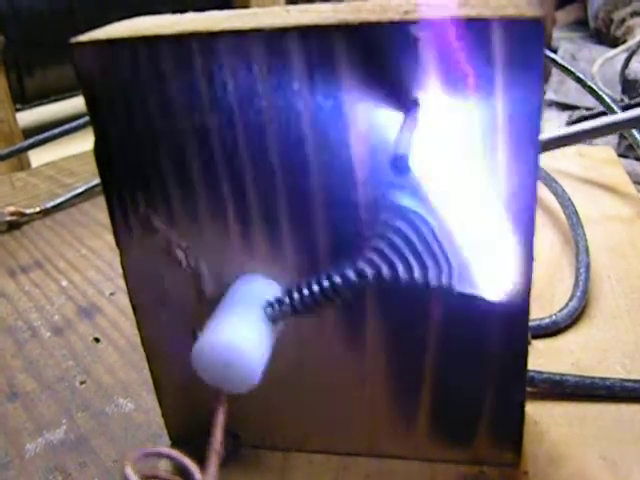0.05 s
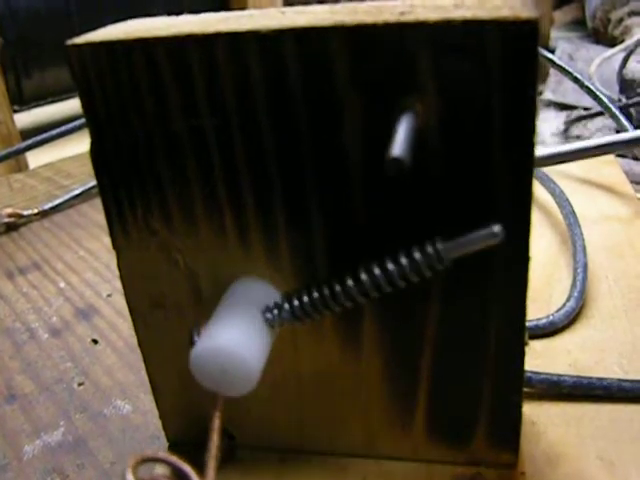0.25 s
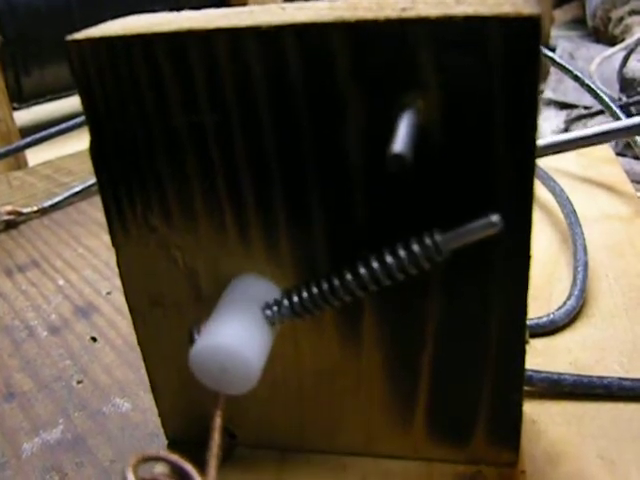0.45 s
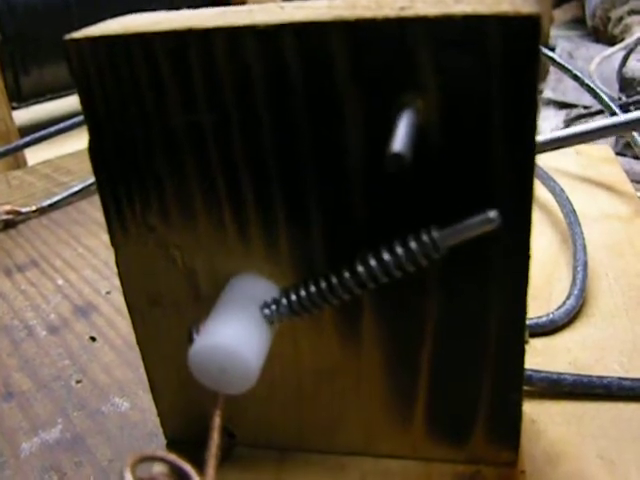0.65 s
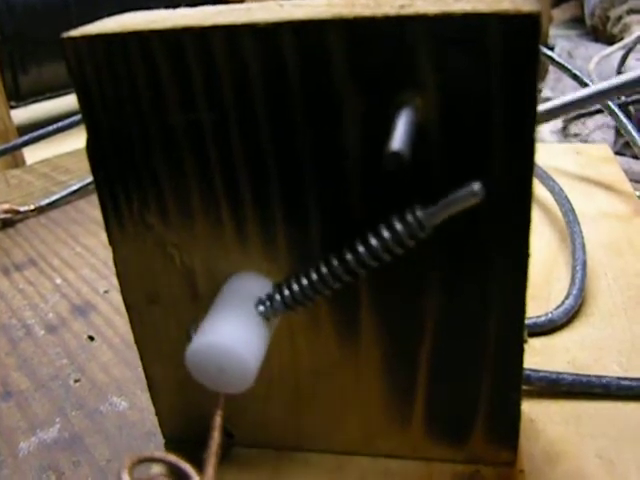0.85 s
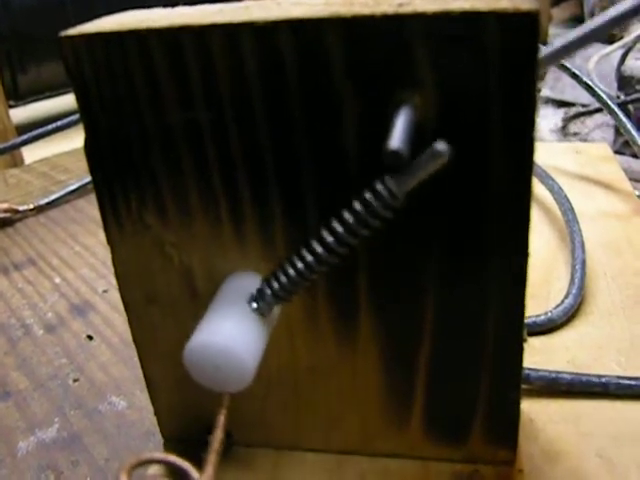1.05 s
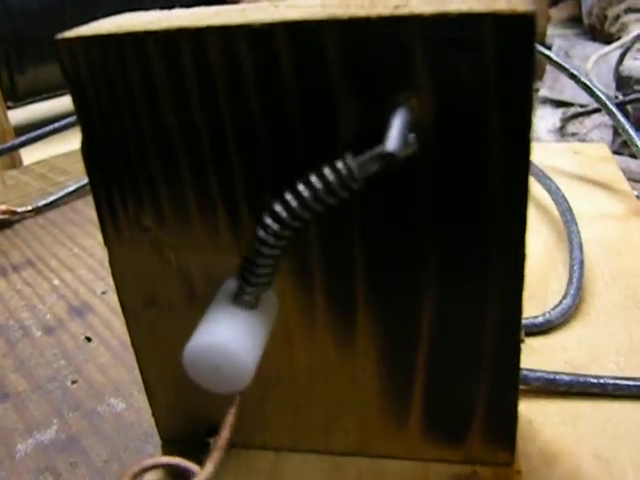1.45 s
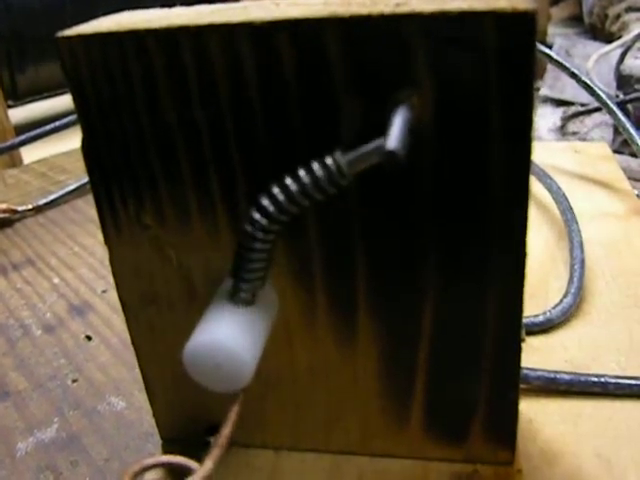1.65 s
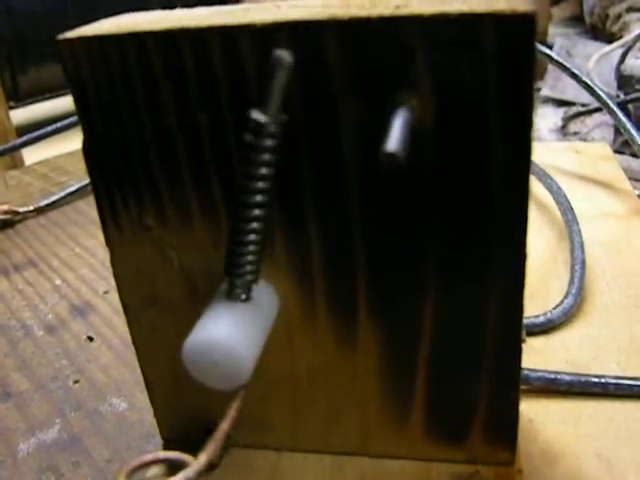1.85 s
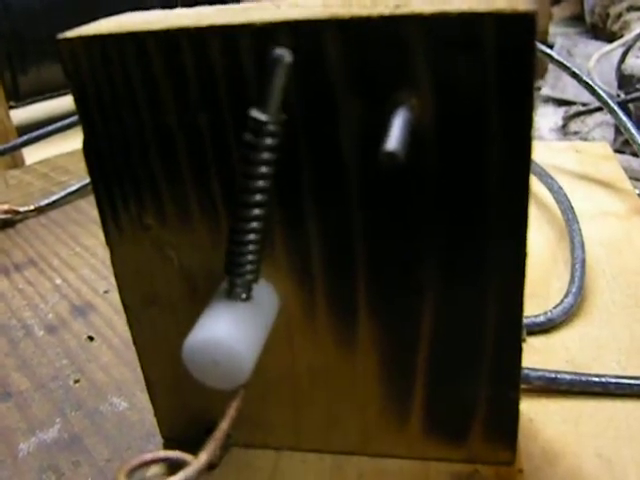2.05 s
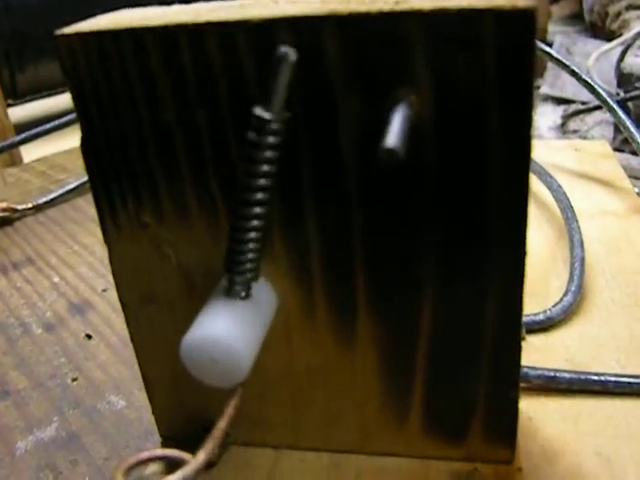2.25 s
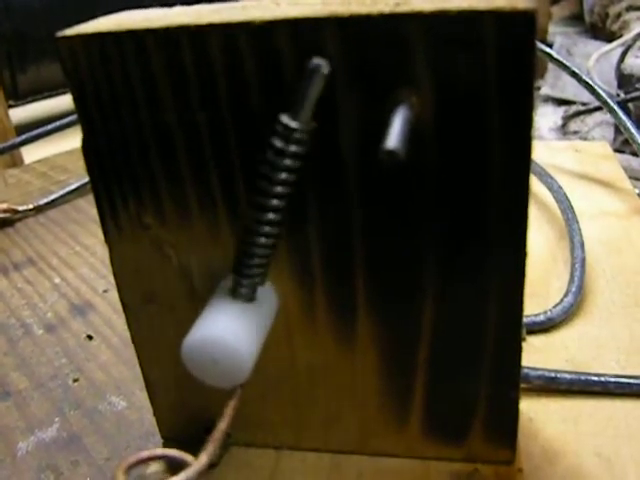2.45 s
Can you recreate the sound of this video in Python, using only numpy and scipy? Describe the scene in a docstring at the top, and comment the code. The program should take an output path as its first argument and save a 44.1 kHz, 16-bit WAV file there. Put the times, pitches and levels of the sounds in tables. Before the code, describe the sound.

Two loud, cracking snaps of a coil spring on a wooden board, over low hum.

```python
"""Snapping coil spring

A coil spring on a wooden board is bent past a steel pin and snaps free twice, once each way. Friction
makes its tip scrape and slip before each release. Each snap is an impulse: it cracks, drives the modes
of the board and the coil, and excites the room. A small narrow-band microphone hears it over low hum
and hiss, and overloads on the snaps."""
import sys
import numpy as np
from scipy import signal
from scipy.fft import rfft, irfft
from scipy.io import wavfile

SR = 44100
rng = np.random.default_rng(int(sys.argv[2]) if len(sys.argv) > 2 else 0)


def digitize_waveform(pressure):
    """Quantize a signal to 16-bit integers and store it at the path in sys.argv[1].

    Rows of a 2-D input are taken as channels; values are limited to [-1, 1].
    """
    field = np.atleast_2d(pressure).T
    bounded = np.clip(field, -1, 1)
    quanta = np.round(bounded * 32767).astype(np.int16)
    wavfile.write(sys.argv[1], SR, quanta)


N = 110250
T = np.arange(N) / SR
HZ = np.fft.rfftfreq(N, 1 / SR)


# releases from the pin: start_s, crack_db, thump_db, board_db, room_db, boom_db
RELEASES = [(0.2314, -4, -2.5, -1.5, -0.5, -27), (1.8872, -4.5, -0.5, 1, -2, -36.5)]
def snaps():
    """Impulse excitation: each release sets off a crack, the board, the coil and the room."""
    out = np.zeros(N)
    attack = 1 - np.exp(-T / 0.00032)
    for release, (start_s, crack_db, thump_db, board_db, room_db, boom_db) in enumerate(RELEASES):
        add(out, start_s, attack * (amp(crack_db) * crack() + amp(board_db) * board(release) + coil(release)))
        add(out, start_s, amp(thump_db) * thump() + amp(boom_db) * boom() + amp(room_db) * room())
    return out


# spectrum of a crack: frequency_hz, relative_db
CRACK_SPECTRUM = [(100, -5.5), (500, 22), (800, 8), (1100, 5), (1600, -1.5), (2200, 14.5), (2900, 5.5),
                  (3900, 10), (5000, -8)]
def crack():
    """A brief impact spreads its energy over a broad band."""
    return burst(noise(CRACK_SPECTRUM), t60_s=0.047)


# modes of the board: pitch_hz, first_release_db, second_release_db, t60_s
BOARD_MODES = [(224.8, -28, -31, 0.22), (250.5, -27, -29, 0.4), (328, -18.5, -19, .24),
               (354, -21, -20, 0.26), (393.8, -28.5, -17, .22), (422.3, -17, -22.5, .26),
               (565.5, -26, -15, .18), (690.6, -21.5, -24.5, .26), (803, -31.5, -18.5, 0.16),
               (1164, -32.5, -32, 0.25), (1380, -21, -23.5, 0.11), (1586, -23, -25, .17),
               (1770, -26, -33.5, 0.24), (2004, -29, -41, 0.2), (2104, -13, -25, 0.083),
               (2217, -43, -10.5, 0.047), (2550, -34, -46, .24), (2805, -28, -41, 0.2)]
def board(release):
    """Modal vibration: each release drives the same modes of the wood in different proportions."""
    return ring([(hz, levels[release], t60_s) for hz, *levels, t60_s in BOARD_MODES])


def thump(pitch_hz=145.2, t60_s=0.039):
    """Heavy damping: the kicked board swings for only a few cycles."""
    return -np.sin(2 * np.pi * pitch_hz * T) * fade(t60_s)


def boom(pitch_hz=131.6, peak_s=0.062, width_s=0.025):
    """A low tone swells and fades under a Gaussian envelope."""
    return np.sin(2 * np.pi * pitch_hz * T) * np.exp(-.5 * ((T - peak_s) / width_s) ** 2)


# bending modes of the coil: pitch_hz, first_release_db, second_release_db, t60_s
COIL_MODES = [(121.2, -40, -43.5, 1.8), (367.3, -48.5, -41, 0.78), (495, -61, -36.5, .8),
              (498, -36.5, -59.5, .75), (556, -31.5, -38.5, .6), (995, -33, -47.5, 0.5),
              (1083, -46, -43, 2.5)]
def coil(release):
    """Light damping: the coil's bending modes ring on faintly after the board."""
    return ring([(hz, levels[release], t60_s) for hz, *levels, t60_s in COIL_MODES])


# impacts of the loose coil: start_s, level_db
CHATTER_HITS = [(0.2396, -11.5), (0.2442, -17.5), (0.2525, -23), (0.304, -34), (1.898, -27), (1.908, -24.5),
                (1.936, -31.5)]
def chatter():
    """Secondary impacts: the loose coil rattles just after each snap."""
    out = np.zeros(N)
    for start_s, level_db in CHATTER_HITS:
        add(out, start_s, amp(level_db) * crack())
    return out


# spectrum of friction: frequency_hz, relative_db
FRICTION_SPECTRUM = [(80, -8.5), (290, -17), (410, 8), (500, -1.5), (580, 2.5), (800, -0.5), (1180, -3),
                     (1550, -15.5), (1900, -10.5), (2300, -3), (2800, -16), (4200, -25.5)]
# slips on the pin or in the holder: start_s, level_db, centre_hz
SLIP_EVENTS = [(0.0708, -33.5, 540), (0.1035, -39.5, 476), (0.1915, -29.5, 735), (0.218, -34, 905),
               (0.228, -30.5, 1320), (0.828, -44.5, 820), (1.531, -41.5, 850), (1.677, -40, 2180),
               (1.6865, -31.5, 1400), (1.841, -39.5, 1180), (1.852, -26.5, 866), (1.870, -20.5, 696),
               (1.880, -26.5, 800), (1.885, -16.5, 1400)]
def slips(t60_s=0.038, echo_db=-18):
    """Stick-slip motion: small jerks of the spring knock on the board and echo."""
    out = np.zeros(N)
    for start_s, level_db, centre_hz in SLIP_EVENTS:
        direct, echo = (noise(FRICTION_SPECTRUM, centre_hz, focus_db=4) for _ in range(2))
        add(out, start_s, amp(level_db) * (burst(direct, t60_s) + amp(echo_db) * reverberation(echo)))
    return out


# envelopes of the sliding tip, one per release: time_s, level_db
SCRAPE_ENVELOPES = [
    [(0, -48), (.06, -53), (.11, -46.5), (.15, -43), (.18, -52.5), (.225, -46), (.26, -78)],
    [(1.3, -90), (1.42, -58), (1.57, -54.5), (1.61, -45), (1.69, -43.5), (1.73, -47.5), (1.81, -50.5),
     (1.88, -41.5), (1.92, -87)],
]
# emphasis of each scrape: centre_hz
SCRAPE_CENTRES = [527, 1090]
def scrape(grains_per_s=1300, spread_db=2.5):
    """Sliding friction: the tip on the pin gives a dense train of random impulses."""
    out = np.zeros(N)
    for envelope, centre_hz in zip(SCRAPE_ENVELOPES, SCRAPE_CENTRES):
        sizes = rng.standard_normal(N) * amp(spread_db * np.minimum(rng.exponential(1, N), 4))
        grains = sizes * (rng.random(N) < grains_per_s / SR)
        level_db = np.interp(T, *np.transpose(envelope))
        out += colour(grains, FRICTION_SPECTRUM, centre_hz, focus_db=1) * amp(level_db)
    return out


# modes of the tip against the pin: pitch_hz, level_db, t60_s
PIN_MODES = [(607, -13, 0.026), (927, -19, .03), (1550, -22.5, 0.045), (2240, -1.5, 0.024),
             (3640, -13, 0.021)]
# landings on the pin: start_s, level_db
BOUNCES = [(1.3052, -28.5), (1.3070, -23.5), (1.3096, -32)]
def tip_bounce(echo_db=-14):
    """Elastic rebound: the returning tip bounces on the pin with a short tink, faintly echoed."""
    out, tink = np.zeros(N), ring(PIN_MODES)
    for start_s, level_db in BOUNCES:
        add(out, start_s, amp(level_db) * tink)
    response = reverberation(noise(CRACK_SPECTRUM))
    response /= abs(rfft(response)).max()
    return out + amp(echo_db) * signal.fftconvolve(out, response)[:N]


# spectrum of a snap's reflections: frequency_hz, relative_db
ROOM_SPECTRUM = [(50, -8.5), (130, -15), (230, 8), (285, -12.5), (340, -0.5), (600, 5.5), (900, -5),
                 (1300, -7), (2400, -13), (3200, -18), (4200, -21.5)]
def room(gain_db=-16.5):
    """Diffuse field: the reflections of a snap merge into decaying noise."""
    return amp(gain_db) * reverberation(noise(ROOM_SPECTRUM))


# reverberation times: frequency_hz, t60_s
ROOM_DECAY = [(60, .24), (400, .3), (1000, .28), (2200, .25), (4000, 0.27)]
def reverberation(source, rise_s=0.0021):
    """Absorption: steady noise, shaped as reflections, builds up and dies at each band's own rate."""
    spectrum, tail = rfft(source), np.zeros(N)
    centres_hz, t60s = np.transpose(ROOM_DECAY)
    for share, t60_s in zip(np.eye(len(t60s)), t60s):
        band_gain = log_interp(list(zip(centres_hz, share)))
        tail += irfft(spectrum * band_gain, N) * fade(t60_s)
    return (1 - np.exp(-T / rise_s)) * tail


# spectrum of the noise floor: frequency_hz, relative_db
FLOOR_SPECTRUM = [(15, -1.5), (30, -6.5), (45, -0.5), (90, -3), (130, -5), (200, -11.5), (300, -17),
                  (550, -20), (1000, -24.5), (2000, -29), (3500, -33.5)]
def background(floor_db=-46.5, hum_hz=121, hum_db=-55):
    """Stationary noise: workshop rumble, with a tone of mains hum."""
    return amp(floor_db) * noise(FLOOR_SPECTRUM) + amp(hum_db) * np.sin(2 * np.pi * hum_hz * T)


def amp(db):
    """Decibels as an amplitude ratio."""
    return 10 ** (np.asarray(db) / 20)


def unit(x):
    """Normalisation to rms 1."""
    return x / np.sqrt(np.mean(x ** 2) + 1e-20)


def log_interp(points):
    """Interpolation over HZ on a log-frequency axis."""
    hz, value = np.transpose(points)
    return np.interp(np.log(HZ + 1), np.log(hz + 1), value)


def add(mix, start_s, sound):
    """Superposition of a delayed sound."""
    part = mix[max(round(start_s * SR), 0):][:len(sound)]
    part += sound[:len(part)]


def fade(t60_s):
    """Exponential decay of 60 dB in t60_s."""
    return np.exp(-np.log(1000) * T / t60_s)


def colour(x, spectrum, centre_hz=1000, focus_db=0):
    """Spectral shaping at rms 1, with a further fall of focus_db one octave from the centre."""
    octaves = np.log2((HZ + 1) / centre_hz)
    gain = amp(log_interp(spectrum) - focus_db * octaves ** 2)
    return unit(irfft(rfft(x) * gain, N))


def noise(spectrum, centre_hz=1000, focus_db=0):
    """Filtered Gaussian noise at rms 1."""
    return colour(rng.standard_normal(N), spectrum, centre_hz, focus_db)


def burst(source, t60_s):
    """A noise transient decaying from rms 1."""
    envelope = fade(t60_s)
    return unit(source * envelope) * np.sqrt(np.mean(envelope ** 2))


def ring(modes):
    """Free vibration: a sum of damped sines, neighbours opposite in sign."""
    return sum((-1) ** k * amp(db) * fade(t60_s) * np.sin(2 * np.pi * hz * T)
               for k, (hz, db, t60_s) in enumerate(modes))


def scene():
    """Superposition of all sources at one microphone."""
    return (snaps() + chatter() + slips() + scrape() + tip_bounce() + background())[None]


def record(dry, rate_hz=8000, full_scale=.72, steps=128, edge_hz=16600):
    """Sampling and quantisation: a coarse converter cuts the treble, adds hiss and overloads on snaps."""
    x = signal.resample_poly(dry, rate_hz, SR, axis=1, window=("kaiser", 5))
    x = np.round(np.clip(x / full_scale, -1, 1) * steps) / steps
    reconstruction = signal.firwin(14001, 1 / 435, window=("kaiser", 9))
    x = signal.resample_poly(x, SR, rate_hz, axis=1, window=reconstruction)[:, :N]
    lowpass = signal.firwin(511, edge_hz, window=("kaiser", 9), fs=SR)
    return signal.oaconvolve(full_scale * np.clip(x, -1, 1), lowpass[None], "same")


dry = scene()
out = record(dry)
digitize_waveform(out)
```